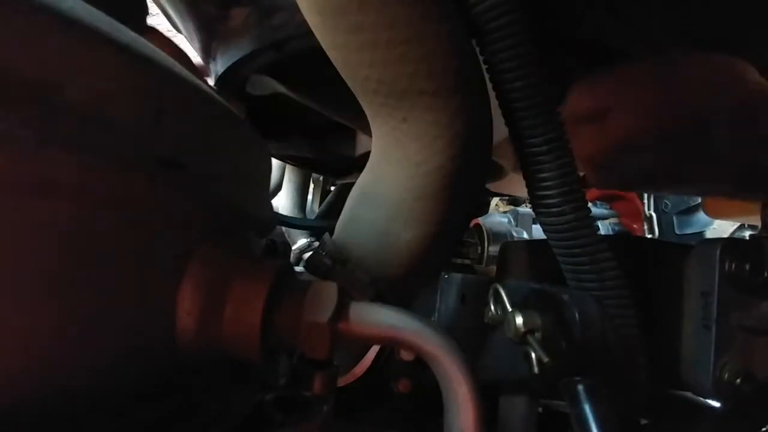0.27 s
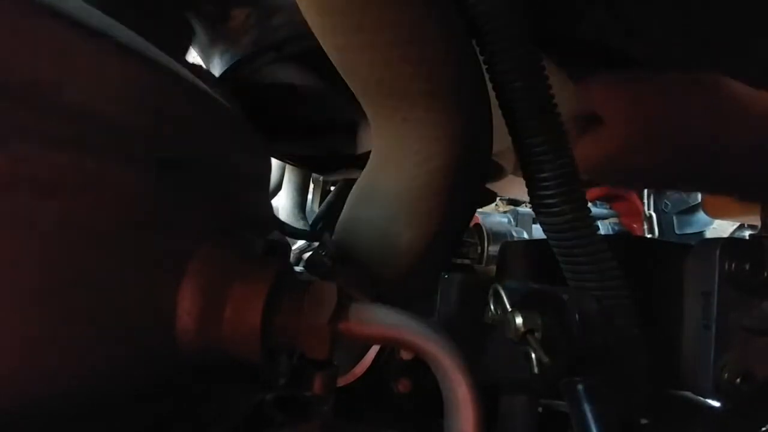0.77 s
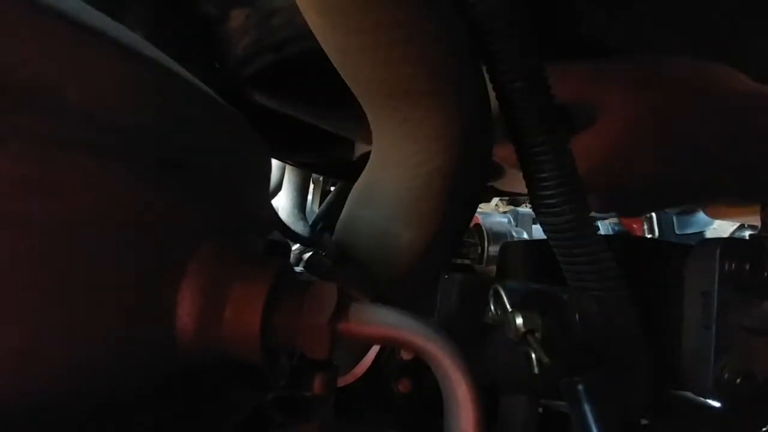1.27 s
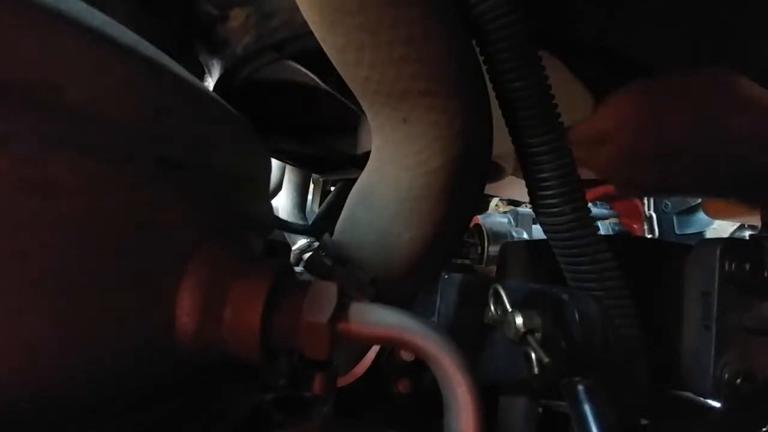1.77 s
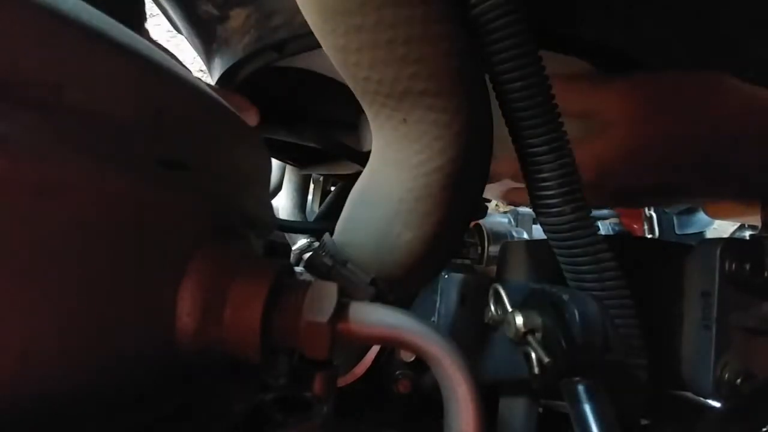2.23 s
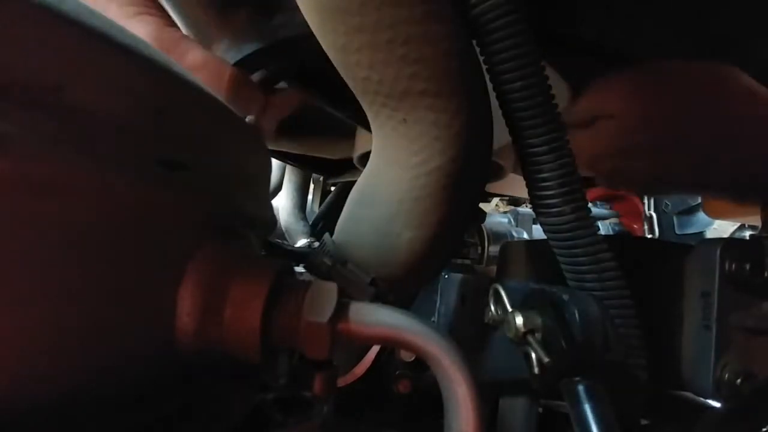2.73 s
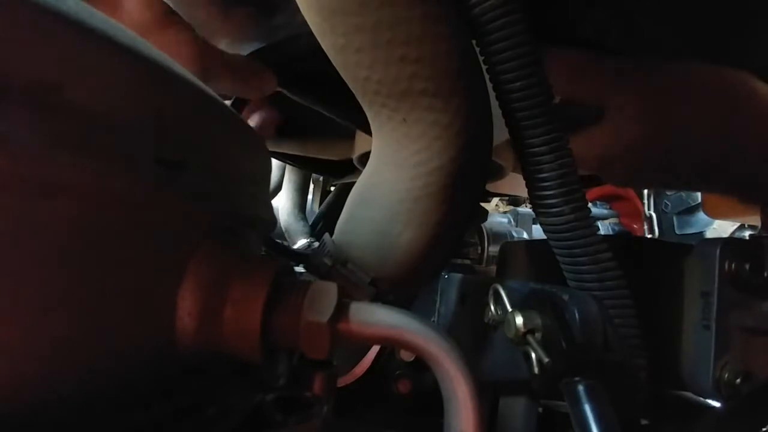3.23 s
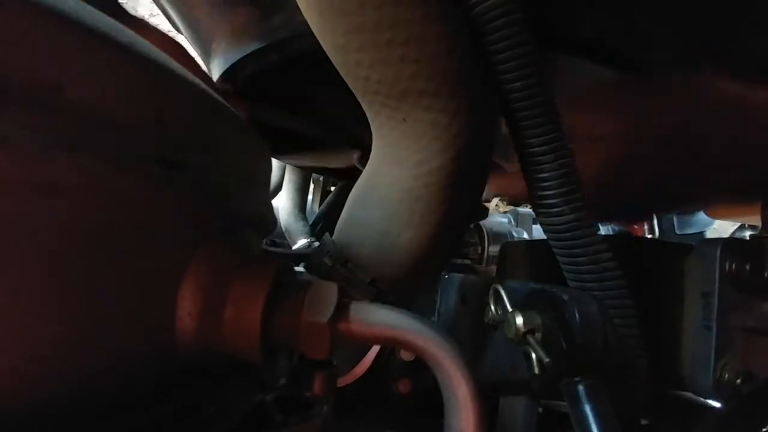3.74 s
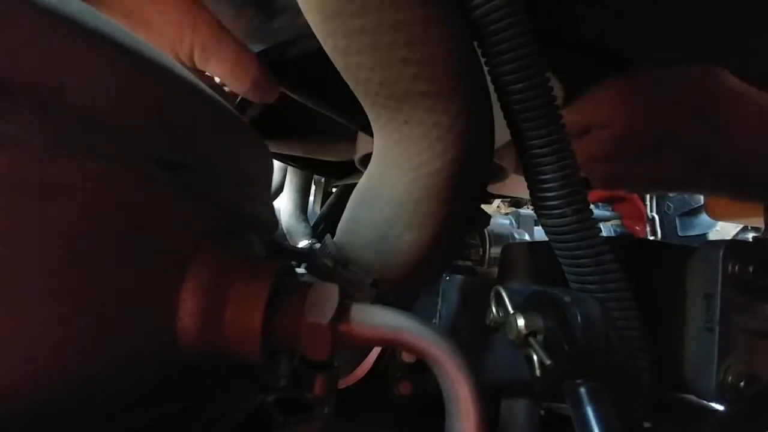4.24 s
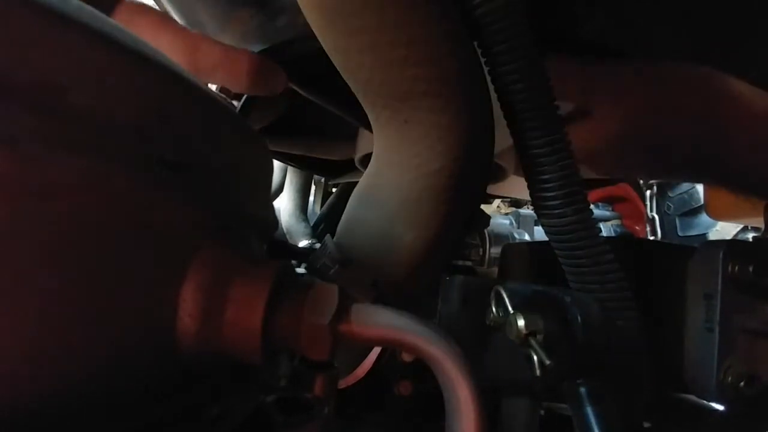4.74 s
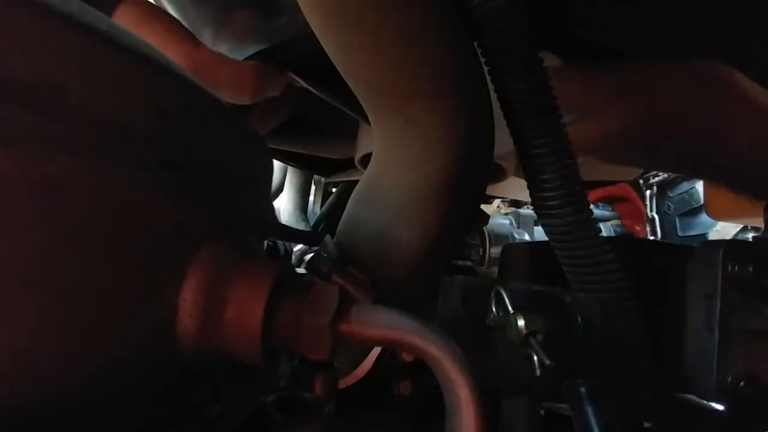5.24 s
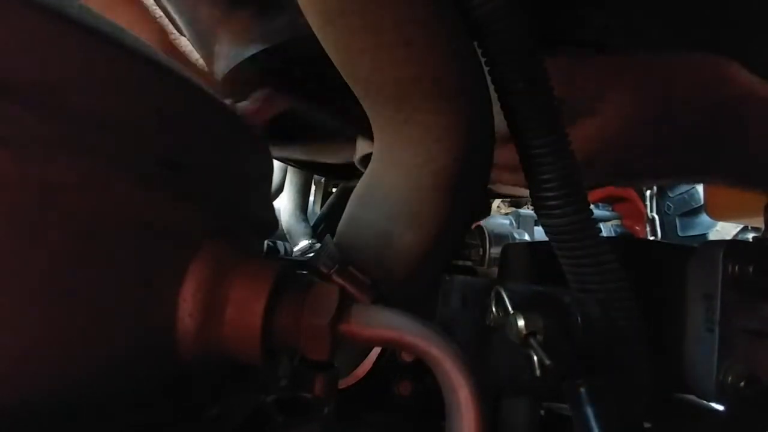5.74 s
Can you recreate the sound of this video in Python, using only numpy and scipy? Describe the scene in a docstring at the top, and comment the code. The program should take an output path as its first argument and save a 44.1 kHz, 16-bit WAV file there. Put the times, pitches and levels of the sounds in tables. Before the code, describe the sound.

Close, irregular knocking and rubbery scuffing on hollow sheet metal in an engine bay, ending with a brief stuttering groan and a hard clunk.

```python
"""A scuff and a knock on sheet metal open the scene: a rubber belt is worked past fan blades and a shroud.
Knocks, scuffs and drag ring the shroud's modes; sliding rubber hisses and rings the blades;
near the end the belt groans by fast stick-slip. A low outdoor rumble of shaped noise lies underneath.
Two close microphone ports hear each source with different level and phase."""
import sys
import numpy as np
from scipy import signal
from scipy.io import wavfile
from scipy.ndimage import uniform_filter1d

SR = 44100
rng = np.random.default_rng(int(sys.argv[2]) if len(sys.argv) > 2 else 0)


def generate_wav(sig):
    """Save sig (samples, or channels by samples) to the path in sys.argv[1] as 16-bit PCM at SR."""
    pcm = np.round(np.clip(np.atleast_2d(sig).T, -1, 1) * 32767).astype(np.int16)
    wavfile.write(sys.argv[1], SR, pcm)


N = 264586
T = np.arange(N) / SR


def gain_of(db):
    """Logarithmic level: decibels to amplitude gain."""
    return 10 ** (np.asarray(db) / 20)


def evened(x):
    """Normalization: scales to rms 1."""
    return x / np.sqrt(np.mean(x ** 2) + 1e-20)


def wander(size):
    """Low-pass noise: a moving average over size samples, at rms 1."""
    return evened(uniform_filter1d(rng.standard_normal(N), size=size))


def read(points, hz):
    """Linear interpolation of a spectrum table on a log-frequency axis."""
    f, value = np.transpose(points)
    return np.interp(np.log(hz + 1), np.log(f + 1), value)


def curves(rows):
    """Linear interpolation of every column of a table at every sample."""
    s, *columns = np.transpose(rows)
    return [np.interp(T, s, column) for column in columns]


def add(mix, s, sound):
    """Superposition: mixes a sound in at time s."""
    part = mix[..., max(round(s * SR), 0):][..., :sound.shape[-1]]
    part += sound[..., :part.shape[-1]]


def resonate(x, hz, width):
    """Resonance: a single peak of the given half-power width in Hz."""
    return signal.lfilter(*signal.iirpeak(hz, hz / width, SR), x)


def noise(points, same, pan, patchy_db, lead, size):
    """Partially coherent noise: shaped spectrum and balance, right port leading by lead (s), in patches."""
    hz = np.fft.rfftfreq(size, 1 / SR)
    a, b, c, d, patches = rng.standard_normal((4 * N // size + 6, len(hz), 5)).T
    patches = uniform_filter1d(patches, size=3, axis=0)
    patches = evened(uniform_filter1d(patches, size=30, axis=1))
    same = np.clip(read(same, hz), 0, 1)[:, None]
    left = a + 1j * b
    early = np.exp(2j * np.pi * hz * lead)[:, None]
    right = same * early * left + np.sqrt(1 - same ** 2) * (c + 1j * d)
    side_db = read(pan, hz) / 2
    spectrum_db = read(points, hz) + np.array([side_db, -side_db])
    z = np.array([left, right]) * gain_of(spectrum_db[..., None] + patchy_db * patches)
    return evened(signal.istft(z, nperseg=size, noverlap=3 * size // 4)[1][:, :N])


# Rumble spectrum, relative: f/Hz, density level/dB per Hz
RUMBLE_SPECTRUM = [(15, -45), (30, -33), (48, -41), (62, -4.5), (90, 2), (118, 3.5), (150, -4.5),
                   (190, -11.5), (300, -16), (450, -67)]
# Rumble strength before its lumps: t/s, level/dB
RUMBLE_LEVEL = [(0, -51.5), (0.35, -50), (0.6, -57.5), (0.85, -52), (0.95, -45.5), (1.3, -52), (1.7, -56),
                (2.2, -53.5), (2.7, -58.5), (3.1, -57), (3.5, -59), (3.8, -60), (3.87, -37), (4.02, -51.5),
                (4.5, -56.5), (5, -59), (5.5, -58), (5.75, -52), (6, -39.5)]


def rumble():
    """Coherent low-frequency noise: outdoor rumble, lumpy and nearly the same at both ports."""
    same, pan = [(38, .45), (65, 0.96), (300, 0.95)], [(1, 0), (SR, 0)]
    lumps = uniform_filter1d(uniform_filter1d(rng.standard_normal(N), size=2500), size=1500)
    level_db = curves(RUMBLE_LEVEL)[0] + 2.74 * evened(lumps)
    return gain_of(level_db) * noise(RUMBLE_SPECTRUM, same, pan, patchy_db=1.2, lead=0, size=2048)


# Steady drag of the belt, relative: t/s, shroud level/dB, hiss level/dB
DRAG = [(0.0, -55, -53), (0.33, -46, -53), (0.73, -48.5, -52.5), (0.98, -44.5, -49), (1.35, -50, -46.5),
        (1.5, -51.5, -59), (1.74, -52.5, -55.5), (1.89, -49, -46), (2.04, -45.5, -56.5), (2.52, -49.5, -48),
        (2.66, -43.5, -46.5), (2.91, -53.5, -51), (3.21, -50.5, -51), (3.34, -50.5, -46.5),
        (3.53, -59.5, -60), (3.71, -54.5, -57.5), (3.89, -55, -60), (4.33, -47.5, -50.5),
        (5.06, -59.5, -64.5), (5.3, -57, -59.5), (5.8, -52.5, -51.5), (5.92, -45, -47.5), (5.97, -44, -58),
        (6.0, -29, -31)]
# The belt hangs slack: middle t/s, half length t/s, dip level/dB
SLACK = [(0.15, 0.019, -7.5), (1.666, 0.056, -11.5), (2.739, 0.021, -8.5)]


def drag_levels():
    """Friction grows with contact force: gains on the shroud and of the hiss dip while the belt is slack."""
    dip_db = sum(db * np.exp(-((T - s) / half) ** 4) for s, half, db in SLACK)
    return gain_of(np.array(curves(DRAG)) + dip_db)


def hump(length):
    """Contact-force envelope of a scuff: presses on quickly, holds, lets go."""
    length = np.clip(length, .005, .3)
    u = np.arange(round(length * SR * 2)) / (length * SR)
    return np.minimum(u / 0.43, 1) * np.exp(-(u / 0.78) ** 3)


# Faint whistles of sliding rubber: start t/s, length t/s, f/Hz, gain of the resonance level/dB
WHISTLES = [(1.329, 0.093, 4300, 20), (2.203, 0.081, 4470, 19), (2.11, 0.13, 6450, 14),
            (2.758, 0.36, 5000, 8), (2.767, .38, 10600, 9.5), (3.22, 0.31, 10970, 14)]


def add_whistles(out):
    """Narrow-band resonance: stretches of the hiss already in out excite a peak at the whistle's pitch."""
    for s, length, hz, db in WHISTLES:
        part = out[:, round(s * SR):round((s + length) * SR)]
        part = part * signal.windows.tukey(part.shape[1], .5)
        add(out, s, gain_of(db) * resonate(part, hz, width=140))


# Blade modes: f/Hz, width f/Hz, relative level/dB
BLADE_MODES = [(1880, 93, 0.5), (2205, 62, -9), (2914, 54, -3.5), (3820, 35, 2), (4435, 33, 0),
               (5100, 38, -10), (6516, 220, -5)]


def blades(drag_hiss, groan_hiss, contact):
    """Modal excitation by broadband friction: drag, groan and contacts ring the blade modes."""
    out = np.zeros((2, N))
    # the drag finds one blade mode, then another
    catches = rng.standard_normal((len(BLADE_MODES), N // 2000 + 2))
    for (hz, width, db), catch in zip(BLADE_MODES, catches):
        catch = np.interp(np.arange(N) / 2000, np.arange(len(catch)), catch)
        out += resonate(gain_of(db - 7.0 + 10.3 * catch) * drag_hiss, hz, width)
        out += gain_of(db) * resonate(contact, hz, width)
    for hz, width, db in BLADE_MODES[:3]:  # the groan grinds on the low modes
        out += gain_of(db + 13.5) * resonate(groan_hiss, hz, width * 2.6)
    return out


# Partials of the blade edge's ping, as multiples of its ring: ratio
PING_PARTIALS = (0.95, 1, 0.96)


def pings():
    """Free decay of closely spaced partials: the blade edge pings at the moment of the blow."""
    out, t = np.zeros((2, N)), np.arange(SR // 20) / SR
    port_phase = np.array([[0], [2.5]])
    for s, _, _, db, hz in KNOCKS:
        ring = sum(np.sin(2 * np.pi * ratio * hz * t + port_phase) for ratio in PING_PARTIALS)
        add(out, s, gain_of(db + 0.5 - 60 * t / 0.04) * ring)
    return out


# Hiss spectrum, relative: f/Hz, density level/dB per Hz
HISS_SPECTRUM = [(880, -47), (1500, -6), (1810, -9), (2060, -7), (2640, -5), (3350, -5), (3690, -3),
                 (4870, -2.5), (6760, -1.5), (7840, -2.5), (8920, -15), (9750, -7.5), (10900, -6),
                 (14900, -9.5), (16000, -4)]
# Hiss balance: f/Hz, left minus right level/dB
HISS_PAN = [(1500, -2), (2400, -5), (4400, -0.5), (6400, -4), (8000, 1.5), (9500, 19), (11500, 11.5),
            (15000, 5)]
# Hiss coherence: f/Hz, left-right likeness (0 to 1)
HISS_SAME = [(1500, 0.63), (4000, 0.1), (8000, 0.028), (16000, 0.084)]


def rubbing():
    """Friction noise: rubber hisses on metal, and each contact also rings at its own frequency."""
    hiss = noise(HISS_SPECTRUM, HISS_SAME, HISS_PAN, patchy_db=0.62, lead=0.00029, size=256)
    hiss = hiss * gain_of(1.44 * wander(300))
    drag_hiss = drag_levels()[1] * hiss
    groan_hiss = groan_on() * gain_of(curves(GROAN)[2]) * hiss
    out, contact = drag_hiss.copy(), groan_hiss.copy()
    add_whistles(out)
    t = np.arange(SR // 20) / SR
    ticks = [(s, gain_of(db - 7.0 - 60 * t / 0.11), hz) for s, _, _, db, hz in KNOCKS]
    scuffs = [(s, gain_of(db - 6.0) * hump(length), hz) for s, _, _, db, hz, length in SCUFFS]
    for s, shape, hz in ticks + scuffs:
        start = round(s * SR)
        part = hiss[:, start:][:, :len(shape)] * shape[:N - start]
        part = np.pad(part, ((0, 0), (0, 900)))  # room for the ring to die
        add(contact, s, part)
        add(out, s, 3.27 * resonate(part, hz, hz / 25))
    return out + contact + blades(drag_hiss, groan_hiss, contact) + pings()


# Fast stick-slip, relative levels: t/s, tone level/dB, slip rate f/Hz, hiss level/dB
GROAN = [(5.762, -41, 569, -60), (5.78, -19.5, 555, -53), (5.797, -23, 564.4, -57), (5.812, -27, 569, -41),
         (5.828, -12.5, 617, -30), (5.84, -17, 544, -22.5), (5.852, -16, 649, -25.5),
         (5.872, -13, 824, -19), (5.886, -17, 700, -22), (5.9, -28, 577, -38), (5.925, -45, 580, -53)]


def groan_on():
    """Gating: true while the belt sticks and slips fast."""
    return (T > GROAN[0][0]) & (T < GROAN[-1][0])


def groan():
    """Stick-slip oscillation: an uneven tone with a weak overtone, louder at the left port."""
    level_db, hz, _ = curves(GROAN)
    jitter, flutter = wander(150), wander(130)
    port_phase = np.array([[.5], [-.5]]) * 1.5
    turn = 2 * np.pi * np.cumsum(hz * (1 + 0.0401 * jitter)) / SR + port_phase
    tone = np.sin(turn) + 0.1 * np.sin(2 * turn)
    # at first every second slip is stronger: half-order partials, gone by 5.803 s
    stumble = 0.83 * np.clip((5.803 - T) / 0.0045, 0, 1)
    tone += stumble * (0.73 * np.sin(turn.mean(0) / 2) + 1.25 * np.sin(3 * turn / 2))
    return groan_on() * gain_of(level_db + 2.5 + 0.73 * flutter + np.array([[2.5], [-2.5]])) * tone


# Sharp knocks on the shroud, relative levels: t/s, peak level/dB, pitch f/Hz, tick level/dB, tick ring f/Hz
KNOCKS = [(0.016, -21.5, 603, -45, 4300), (0.204, -29.5, 473, -62, 6140), (0.233, -27.5, 461, -70, 6000),
          (0.32, -27, 506, -47.5, 3120), (0.3595, -37, 710, -35.5, 2200), (0.408, -29, 654, -45, 5950),
          (0.9103, -21.5, 425, -48, 1500), (0.9195, -28, 522, -56, 1510), (1.037, -33, 836, -46, 2860),
          (1.229, -20, 455, -36.5, 3780), (1.427, -22.5, 478, -76, 4220), (1.442, -27.5, 473, -64, 4200),
          (1.7075, -28, 580, -33, 3270), (1.722, -29, 644, -57, 3980), (1.7265, -35, 725, -49, 1500),
          (1.738, -27, 392, -46, 6640), (1.784, -40, 390, -45, 2930), (1.919, -17.5, 463, -45, 7060),
          (2.013, -24, 442, -42, 5460), (2.049, -37, 1187, -41, 2700), (2.422, -29, 632, -44, 4390),
          (2.621, -25, 575, -47, 7000), (2.639, -27.5, 423, -54, 6000), (3.16, -25.5, 398, -39, 6700),
          (3.17, -12, 635, -45, 2980), (3.177, -16.5, 716, -51, 1300), (3.185, -17.5, 607, -62, 1750),
          (3.261, -39, 524, -40.5, 3900), (3.403, -46, 1155, -31.5, 1710), (3.48, -32, 787, -41, 4460),
          (3.632, -39.5, 854, -72, 4480), (3.82, -25, 760, -59, 1400), (3.869, -20, 550, -47, 1720),
          (3.877, -20, 436, -58, 2000), (3.9234, -20, 478, -68, 1200), (3.965, -31.5, 552, -78, 7060),
          (4.151, -30.5, 500, -53, 4530), (4.205, -30, 450, -29, 2880), (4.226, -33.5, 740, -55, 4360),
          (4.396, -33, 520, -82, 6160), (4.61, -29, 382, -52, 4630), (4.883, -30, 715, -38, 6350),
          (5.535, -38, 520, -46, 5730), (5.5455, -35, 470, -43, 3000), (5.74, -28.5, 478, -46.5, 6700),
          (5.9378, -7.5, 540, -22, 1500), (5.9424, -14.5, 513, -28, 2320), (5.948, -15.5, 766, -44, 1740)]


def slaps():
    """Damped oscillation: each blow is a few cycles of the belt and a click, beside the shroud's ring."""
    out, t = np.zeros((2, N)), np.arange(SR // 15) / SR
    click = np.diff(signal.windows.hann(9), prepend=0)
    for s, peak_db, pitch, tick_db, _ in KNOCKS:
        t60 = max(0.046 * gain_of(-0.22 * (peak_db + 30.0)), .01)  # s; harder blows die sooner
        rise = 0.0019 * gain_of(0.076 * (peak_db - tick_db - 30))  # s; duller blows rise slower
        turn = 2 * np.pi * pitch * t + np.array([[.2], [-.2]])
        cycles = np.sin(turn) + .5 * np.exp(-t / 0.0017) * np.sin(1.99 * turn)  # the overtone dies first
        add(out, s + .001, gain_of(peak_db + 3 - 60 * t / t60) * np.minimum(t / rise, 1) * cycles)
        add(out[1], s + 0.001323, gain_of(tick_db + 16) * click)
    return out


def near(pitch):
    """Selective excitation: a contact favours the modes near its pitch, 32 dB per octave down to -17 dB."""
    hz = np.transpose(SHROUD_MODES)[0][:, None]
    return gain_of(-np.minimum(32 * abs(np.log2(hz / pitch)), 17))


# The belt rides along the rim: start t/s, length t/s, relative level/dB, pitch f/Hz
RIM = [(0.253, 0.27, -39, 1490), (0.907, 0.87, -59, 1200), (1.743, 0.025, -49, 1160),
       (2.066, 0.11, -38, 1350), (2.216, 0.3, -42.5, 1250), (3.335, 0.16, -58, 1200),
       (4.137, 0.34, -37.5, 1480), (5.532, 0.012, -42, 1200)]


def rim():
    """Sustained friction drive: each ride starts quickly, fades steadily and lets go."""
    out = np.zeros((len(SHROUD_MODES), N))
    rise_s, release_s, fade_db_per_s = 0.016, 0.05, -46
    for s, length, db, pitch in RIM:
        t = np.arange(0, length + release_s, 1 / SR)
        ends = np.minimum(t / rise_s, (length + release_s - t) / release_s)
        add(out, s, near(pitch) * np.clip(ends, 0, 1) * gain_of(db + fade_db_per_s * t))
    return out


def grit(spread_db, per_s):
    """Random stick-slip: rubber grips and lets go, noise whose strength jumps from slip to slip."""
    steps = np.clip(rng.standard_normal(N), -3, 1.4)[(T * per_s).astype(int)]
    strength = gain_of(spread_db * uniform_filter1d(steps, size=40))
    return evened(rng.standard_normal(N) * strength)


# Scuffs along a blade, relative levels: t/s, peak level/dB, pitch f/Hz, hiss level/dB, brightest f/Hz, length t/s
SCUFFS = [(0.0, -10, 520, -30, 4400, 0.01), (0.007, -22, 520, -27, 4470, 0.045),
          (0.188, -28, 477, -45.5, 10000, 0.091), (0.332, -27.5, 518, -32, 4100, 0.066),
          (0.436, -67, 560, -44, 6450, 0.072), (0.395, -29.5, 643, -37.5, 7200, 0.074),
          (0.851, -26, 483, -34.5, 10500, 0.083), (1.142, -34, 494, -41, 6900, 0.22),
          (1.222, -8.5, 364, -30.5, 2410, 0.028), (1.333, -26.5, 720, -45, 6300, 0.056),
          (1.419, -36, 476, -32.5, 4130, 0.063), (1.456, -28.5, 500, -34.5, 6800, 0.037),
          (1.593, -54, 430, -45.5, 3740, 0.044), (1.702, -17.5, 736, -31, 2170, 0.032),
          (1.853, -29.5, 474, -49, 5930, 0.054), (1.866, -26, 470, -32, 5740, 0.17),
          (1.907, -20, 400, -32, 7000, 0.07), (2.03, -21, 380, -35, 6600, 0.036),
          (2.05, -41, 360, -20.5, 10430, 0.018), (2.19, -32.5, 670, -36.5, 4500, 0.099),
          (2.273, -27, 1230, -23, 5420, 0.049), (2.448, -34, 766, -36, 6300, 0.075),
          (2.576, -37.5, 645, -39, 6400, 0.11), (2.66, -26, 610, -39.5, 7000, 0.05),
          (2.778, -26, 587, -43, 6700, 0.073), (3.135, -18.5, 440, -36, 6500, 0.041),
          (3.151, -15, 647, -23.5, 2940, 0.039), (3.222, -35, 554, -38, 6100, 0.089),
          (3.471, -25, 660, -35.5, 4460, 0.043), (3.622, -43, 840, -36.5, 4400, 0.032),
          (3.796, -27.5, 765, -29, 3710, 0.089), (3.84, -34, 776, -22, 11100, 0.032),
          (3.864, -26, 476, -45, 10100, 0.068), (3.921, -34.5, 540, -34, 10200, 0.071),
          (4.141, -30, 1390, -49.5, 10200, 0.056), (4.191, -29.5, 680, -38.5, 10900, 0.065),
          (4.418, -42, 517, -45, 10800, 0.023), (4.603, -18.5, 363, -30, 2920, 0.031),
          (4.867, -29, 792, -38.5, 6260, 0.038), (4.914, -72, 560, -47, 2930, 0.089),
          (5.531, -22, 415, -30, 10900, 0.029), (5.955, -36, 806, -24, 10900, 0.049)]


def rubber_drive(hz):
    """Friction forcing: drag, rim rides, groan and scuffs drive every mode, one drive for each port."""
    drag = drag_levels()[0] * gain_of(1.24 * wander(500))  # small catches
    upper = (drag * gain_of(-17.5) + rim()) * gain_of(21)
    drive = np.where(hz[:, None] < 900, drag * gain_of(15.5), upper)
    groan_db, groan_hz, _ = curves(GROAN)
    tilt_db = 9.5 * np.log2(hz[:, None] / 600)  # the groan favours upper modes
    drive += groan_on() * near(groan_hz) * gain_of(groan_db + 15.5 + tilt_db)
    for s, peak_db, pitch, _, _, length in SCUFFS:
        add(drive, s, near(pitch) * gain_of(peak_db + 15) * hump(length))
    rough = grit(spread_db=1.0, per_s=600)
    # above 450 Hz the right port hears partly another grit
    right_rough = 0.55 * rough + 0.54 * grit(spread_db=8.5, per_s=250)
    return drive * rough, drive * np.where(hz[:, None] < 450, rough, right_rough)


def knock_drive():
    """Impulsive forcing: a short blow, then the part rattles briefly."""
    blows = np.zeros((len(SHROUD_MODES), N))
    blow = np.pad(signal.windows.hann(24), (0, 900 - 24))
    chatter = rng.standard_normal((len(KNOCKS), 900)) * np.exp(-np.arange(900) / SR / 0.018)
    for (s, peak_db, pitch, *_), rattle in zip(KNOCKS, chatter):
        add(blows, s, near(pitch) * gain_of(peak_db + 13) * (blow + .6 * rattle))
    return blows


# Shroud modes: f/Hz, width f/Hz, relative level/dB, left minus right level/dB, left phase lead/rad
SHROUD_MODES = [(273, 23, -15, 0.3, -26), (427.4, 37, -11, -26, -1.6), (474, 33.5, -0.5, 8.5, -0.9),
                (529.6, 19.7, 2.5, -2, -0.64), (580.3, 50.6, 4.5, 5.5, 0.63), (648, 16, -4.5, -6, 0.9),
                (778.5, 145, 1, 3, 1.03), (902, 80.6, 0.5, 17.5, 5), (984, 27, -2.5, -3, 2.5),
                (1199, 46, 2, 1, -11), (1359, 27, -6.5, 17.5, 4.5), (1504, 34, -11, -13, 2.5)]


def shroud():
    """Modal synthesis: each mode of the sheet metal is a damped complex resonator, driven by every contact."""
    hz, width, db, pan_db, lead = np.transpose(SHROUD_MODES)
    left_drive, right_drive = rubber_drive(hz)
    blows = knock_drive()
    out, side = np.zeros((2, N)), np.array([.5, -.5])
    for k in range(len(hz)):
        pole = np.exp((2j * np.pi * hz[k] - np.pi * width[k]) / SR)
        drive = [left_drive[k] + blows[k], right_drive[k] + blows[k]]
        ring = signal.lfilter([1 - abs(pole)], [1, -pole], drive)
        port = gain_of(db[k] + side * pan_db[k]) * np.exp(1j * lead[k] * side)
        out += 2 * (port[:, None] * ring).imag
    # little of the shroud's sound lies below 300 Hz
    out = signal.sosfilt(signal.butter(6, 300, "high", fs=SR, output="sos"), out)
    return signal.sosfilt(signal.butter(2, 2200, fs=SR, output="sos"), out)


def scene():
    """Superposition of all sources, from the background to the shroud."""
    return rumble() + rubbing() + groan() + slaps() + shroud()


def record(dry):
    """Saturation and band limit: the input stage rounds off the loudest peaks, then cuts above 16 kHz."""
    soft = .95 * np.tanh(dry / .95)
    low_pass = signal.firwin(511, 16000, window=("kaiser", 9), fs=SR)
    return signal.oaconvolve(soft, low_pass[None], "same")


dry = scene()
out = record(dry)
generate_wav(out)
```